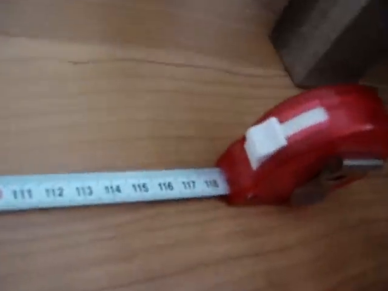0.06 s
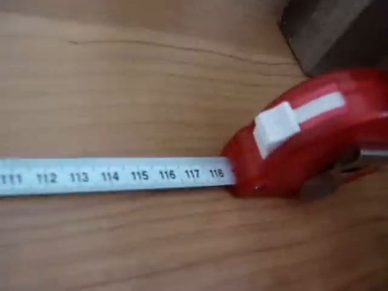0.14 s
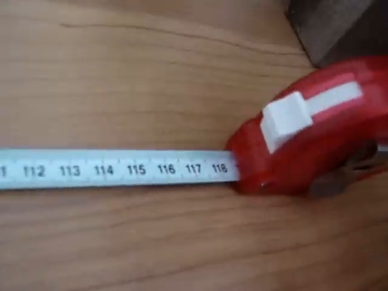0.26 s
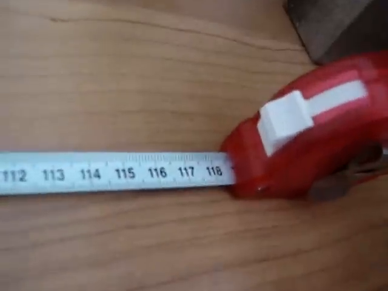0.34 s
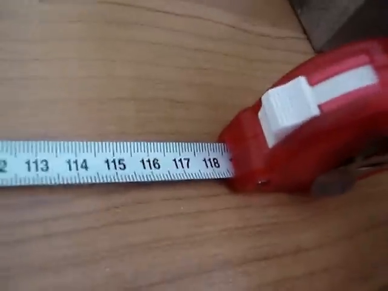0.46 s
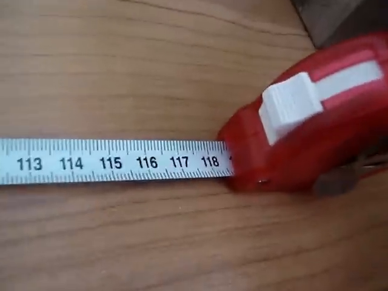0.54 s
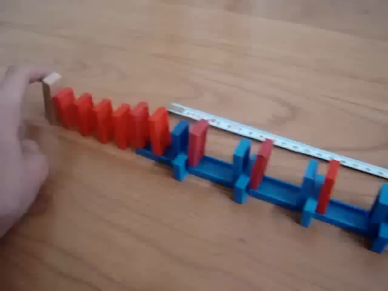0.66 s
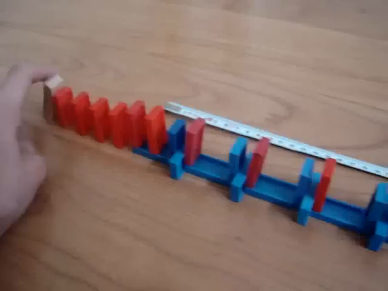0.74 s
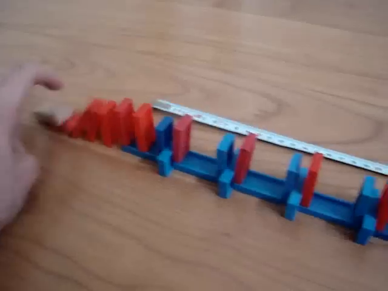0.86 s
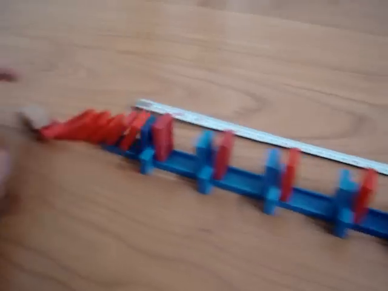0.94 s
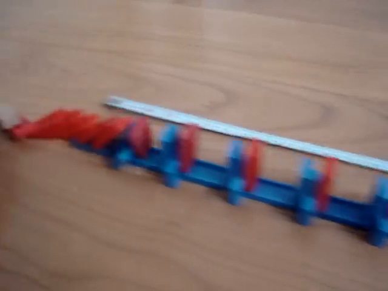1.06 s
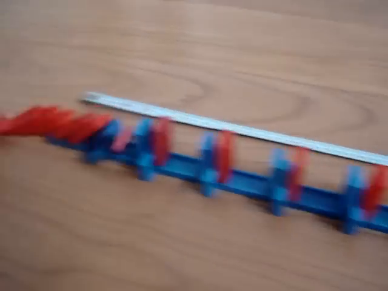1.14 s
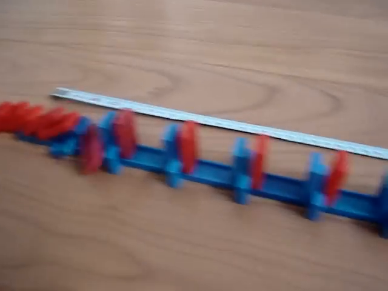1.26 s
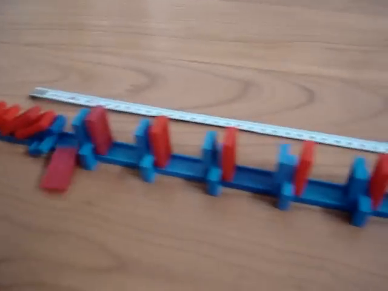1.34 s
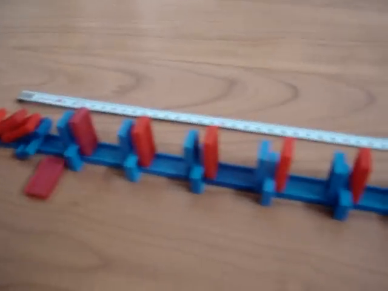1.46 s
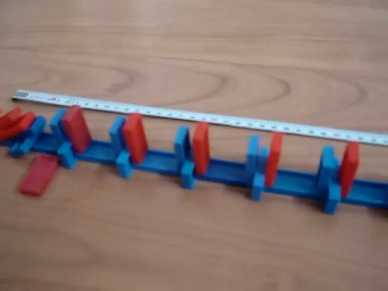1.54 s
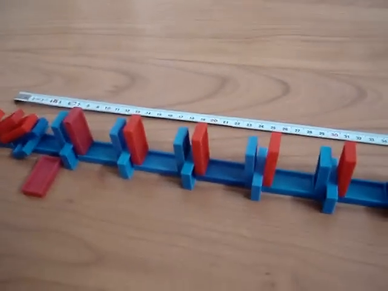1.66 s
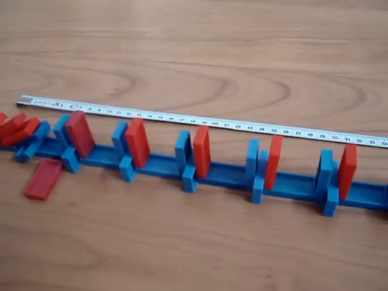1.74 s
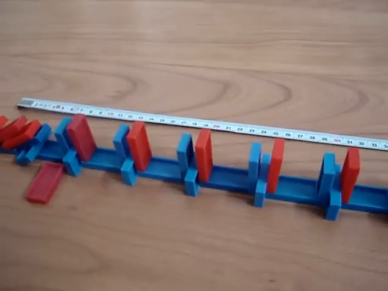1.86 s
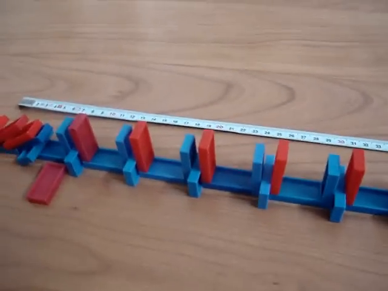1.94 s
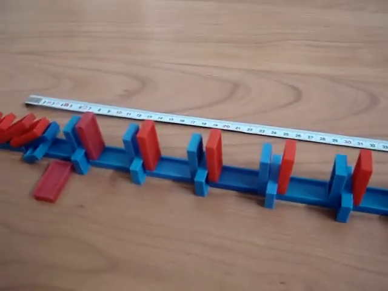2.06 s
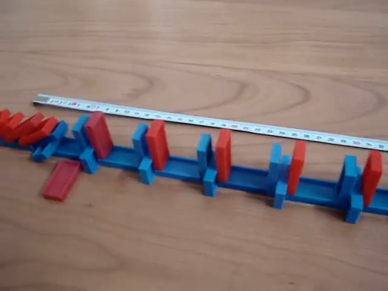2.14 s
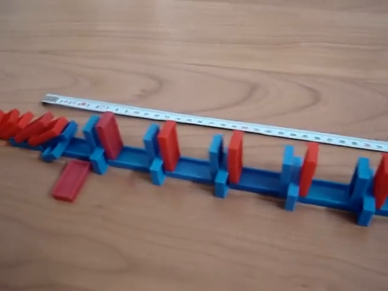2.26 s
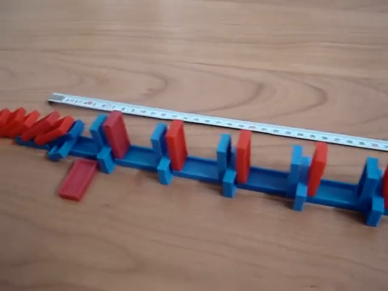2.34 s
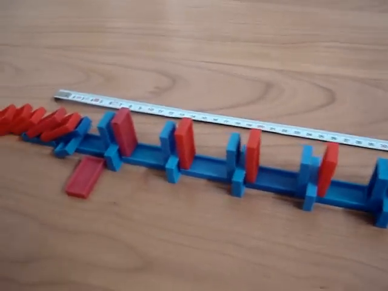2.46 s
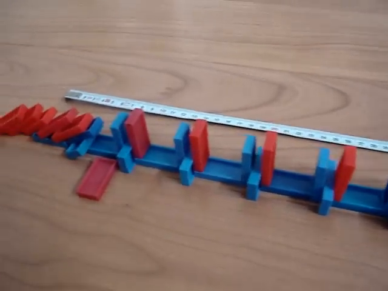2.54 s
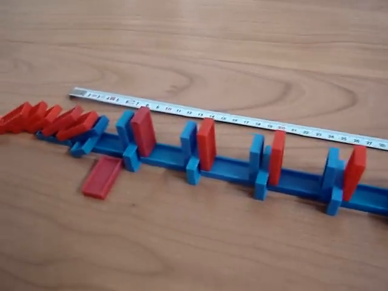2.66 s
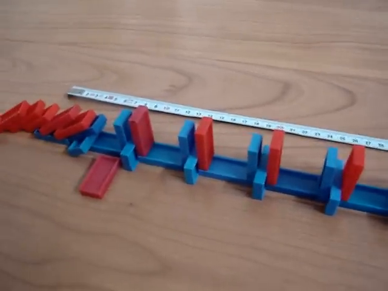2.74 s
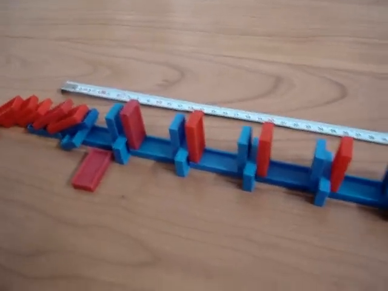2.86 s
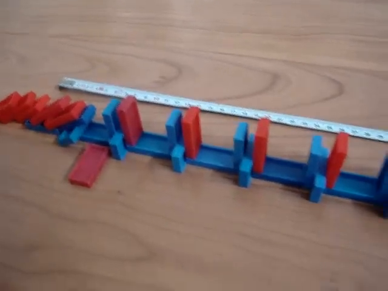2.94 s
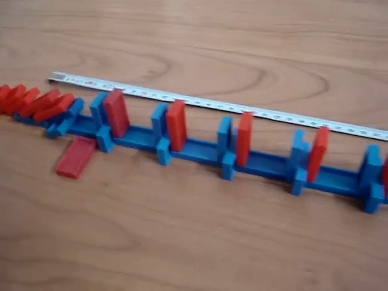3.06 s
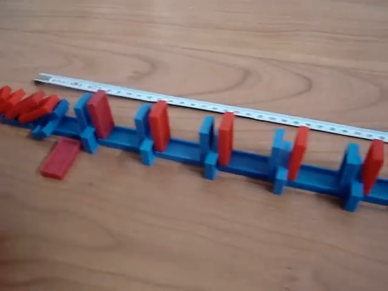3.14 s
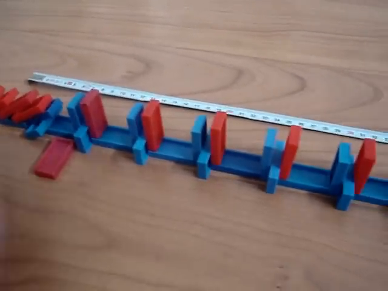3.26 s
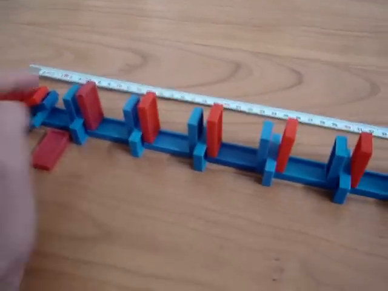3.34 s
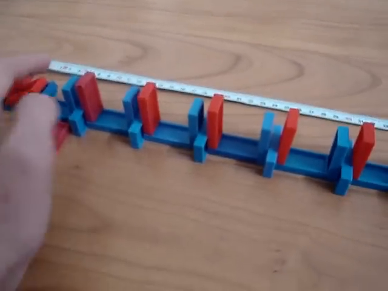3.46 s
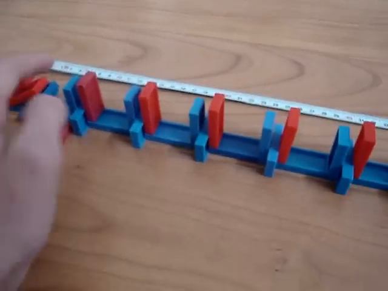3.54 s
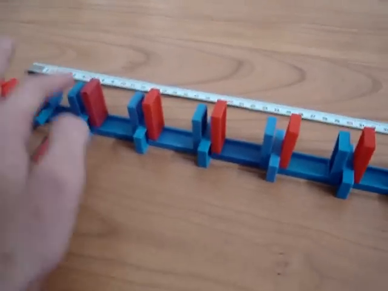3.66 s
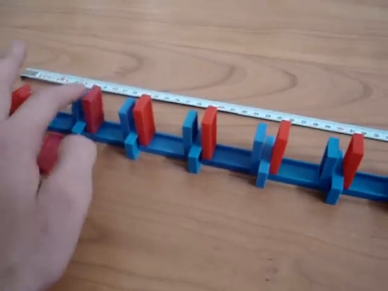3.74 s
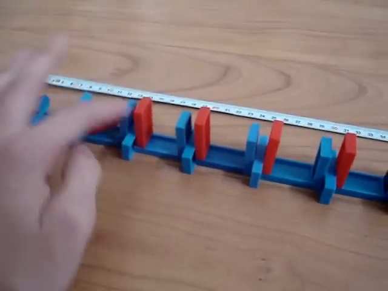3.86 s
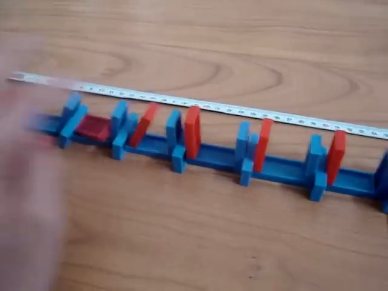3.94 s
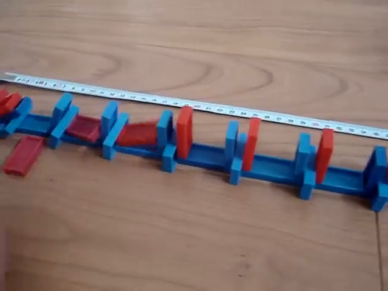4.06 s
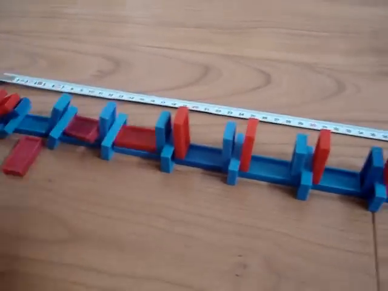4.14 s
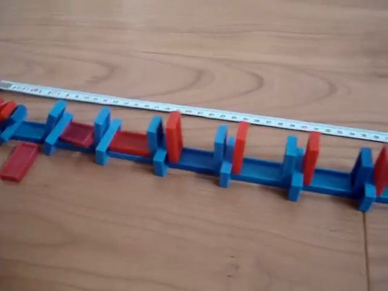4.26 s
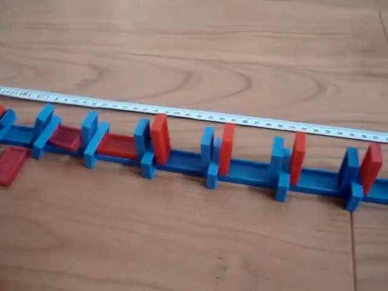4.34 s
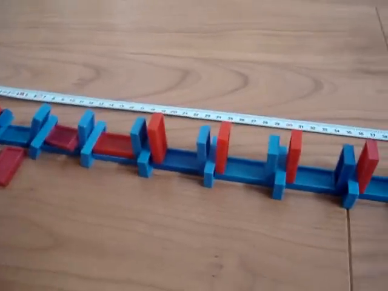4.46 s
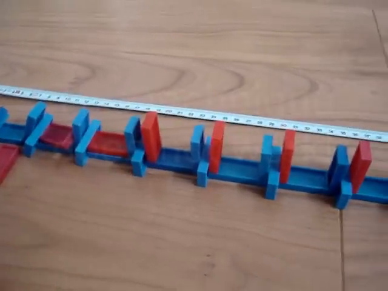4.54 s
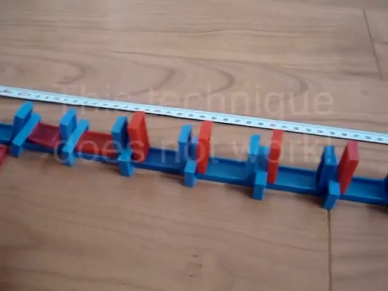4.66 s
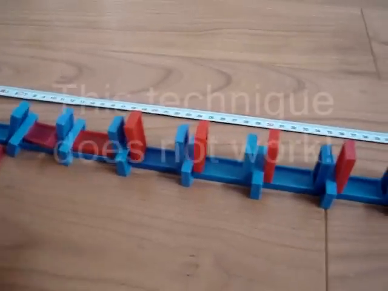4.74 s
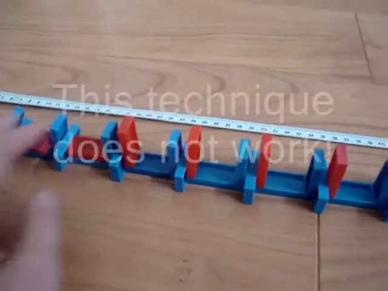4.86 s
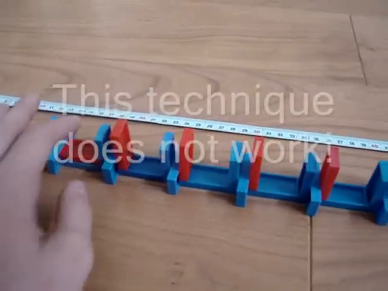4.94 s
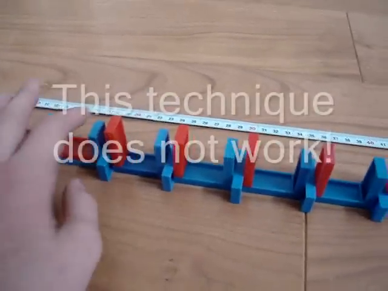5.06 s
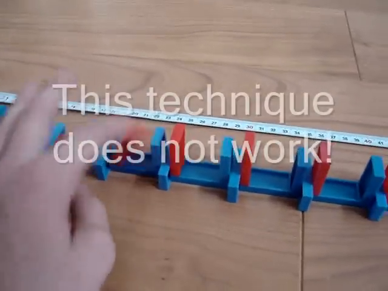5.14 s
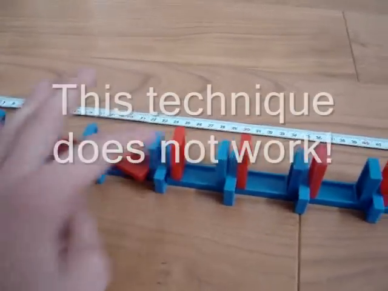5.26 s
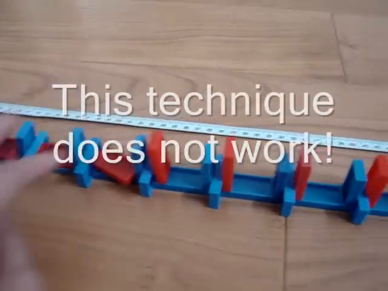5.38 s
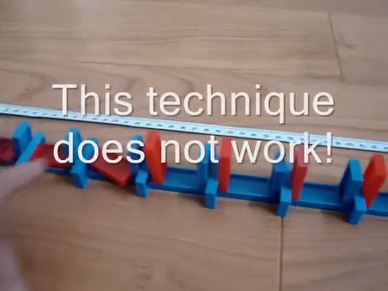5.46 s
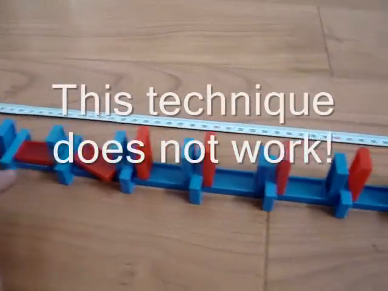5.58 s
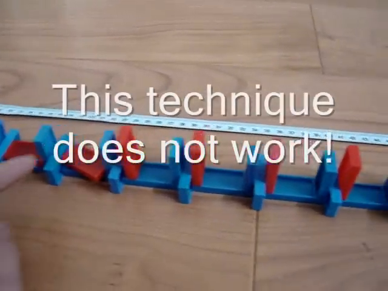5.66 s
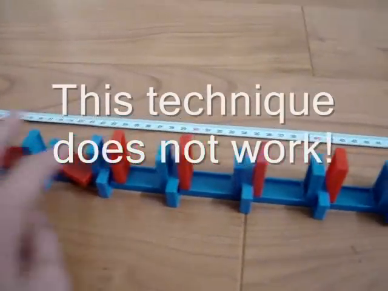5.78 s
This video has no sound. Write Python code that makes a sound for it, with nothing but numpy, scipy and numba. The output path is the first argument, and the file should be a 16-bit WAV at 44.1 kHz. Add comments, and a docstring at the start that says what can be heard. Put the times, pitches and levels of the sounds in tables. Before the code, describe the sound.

Small plastic dominoes topple on a wooden floor in a fast clicking run, followed by two shorter bursts of clatter.

```python
"""A faint hiss and one dry click, then small plastic dominoes topple along a plastic track on a wooden
floor: one long run, then a few pushed over by hand. Each contact cracks, rings the tiles near 5 kHz and
knocks the floor, and a bare room echoes it over a faint hum. A small camera picks it all up; its
automatic volume control dips after every burst and slowly comes back."""
import sys
import numpy as np
from scipy import signal
from scipy.fft import rfft, irfft
from scipy.io import wavfile
from numba import njit

SR = 44100
rng = np.random.default_rng(int(sys.argv[2]) if len(sys.argv) > 2 else 0)


def persist_wave(psi):
    """Save psi, clipped to +-1, as 16-bit WAV."""
    counts = np.round(np.clip(psi, -1, 1) * 32767).astype(np.int16)
    wavfile.write(sys.argv[1], SR, np.atleast_2d(counts).T)


N = 256220
TIME = np.arange(N) / SR
RING = TIME[:SR // 6]  # time axis of one short sound

# Single blows of tile on tile: (time [s], strength [dB], flatness [0 edge-on to 1 face down],
# extra ping level [dB], clack pitch [Hz], upper ring pitch [Hz])
SINGLE_BLOWS = [(0.899, -36.5, 0.96, 0, 2690, 7400), (0.954, -17, 0.56, 1, 4100, 7040),
                (0.98, -24, 0.82, -1, 3500, 6340), (0.987, -13, 0.39, -1, 3480, 6400),
                (1.003, -13.5, 0.52, -10, 3250, 6550), (1.149, -16.5, 0.33, -12, 4270, 6370),
                (1.272, -20, .2, -4, 3130, 5630), (1.305, -24.5, 0.54, -4, 4300, 9050),
                (1.312, -20.5, 0.85, -13, 4500, 8000), (1.386, -16, 0.9, 1.5, 3130, 7400),
                (1.42, -28, .5, -20, 4300, 6420), (1.438, -16.5, 0.59, 2, 2810, 7300),
                (1.477, -17, 0.79, 2.5, 3880, 8140), (1.529, -17, 0.68, -2, 4150, 8000),
                (1.576, -23, 0.52, -1.5, 4000, 7400), (3.817, -37.5, 0.27, -5.5, 3370, 6600),
                (3.965, -19.5, .23, -3, 3350, 5600), (3.974, -19, 0.19, -1.5, 4300, 5930),
                (3.996, -19, 0.36, -14, 4270, 6100), (4.026, -31, .05, 2.5, 4300, 6060),
                (4.095, -29, 0.28, -12, 4100, 5570), (4.148, -18, 0.23, -3.5, 4260, 6240),
                (4.158, -22.5, 0.049, -0.5, 4250, 6460), (4.224, -28.5, 0.68, -3, 3570, 7260),
                (4.248, -23, 0.59, -3, 3100, 9100), (4.264, -22, 0.44, -16, 3080, 6460),
                (4.281, -26.5, 0.69, -13.5, 3400, 6600), (5.3295, -16.5, 0.47, -3, 4260, 5760),
                (5.3655, -21.5, 1, 1.5, 3470, 6100), (5.3775, -18.5, 0.34, -9, 4300, 9100),
                (5.406, -25, 1, -11, 4120, 8850), (5.423, -27, 1, 5, 4230, 9130)]
# Rows of falling tiles, as points on a curve with the same columns
FIRST_ROW = [(0.993, -12, 0.24, -5, 3480, 6440), (1.02, -18, 0.13, 3, 2870, 6900),
             (1.06, -20, 0.13, -1, 4170, 8100), (1.095, -18.5, 0.23, -1, 4150, 6300),
             (1.118, -27.5, 0.73, 6, 3420, 8600), (1.16, -22.5, 0.43, -3, 3650, 6200),
             (1.22, -29.5, .5, -6, 3280, 6260)]
SECOND_ROW = [(1.444, -23.5, 0.62, 7, 2700, 8050), (1.465, -26, 0.49, 1.5, 3100, 7340),
              (1.52, -31.5, 0.27, 12.5, 4200, 8000), (1.58, -37, 0.51, 9.5, 4000, 8070),
              (1.62, -59, .55, -16, 4000, 8000)]
LAST_PUSH = [(5.338, -19, 0.27, -1.5, 4400, 5870), (5.37, -36, 0.32, -9, 4200, 6100),
             (5.39, -23, 0.43, -5, 4200, 8900), (5.43, -30, 0.2, -8, 4130, 8900)]
# Tiles landing flat: (time [s], level [dB])
SLAPS = [(0.9872, -4), (1.271, -11), (1.3862, -5.5), (3.9649, -8), (4.1481, -12.5), (4.2483, -9),
         (5.3298, -8.5), (5.3772, -0.5)]
# Fingers nudging tiles: (time [s], level [dB], pitch [Hz])
NUDGES = [(0.899, -20, 800), (2.122, -41, 2220), (3.034, -39, 1090), (3.044, -32.5, 1140),
          (3.33, -42.5, 2100), (3.818, -28, 730), (3.915, -30.5, 900), (3.925, -24, 1230),
          (5.267, -32, 1190), (5.664, -55.5, 2600)]
# A hand shifting on the camera: (time [s], level [dB])
BUMPS = [(2.116, -47), (2.93, -47), (3.32, -54), (3.688, -41), (4.94, -46), (5.232, -38)]

# Modes, the tones a struck thing rings with: (pitch [Hz], level [dB], time to fade by 60 dB [s])
CLACK_MODES = [(2470, -8, 0.006), (2830, 0, 0.0083), (2990, -0.5, 0.0075), (3325, -4, 0.0055),
               (3750, -5, 0.0078), (3970, -6, 0.015), (4277, 4.5, 0.011)]  # a tile's face
UPPER_MODES = [(5280, -0.5, 0.014), (5640, 4, 0.012), (6075, 5, .018), (6336, 4, 0.017), (6850, -3, 0.016),
               (7330, -5.5, .014), (7770, -3.5, 0.009), (8034, -0.5, 0.029), (8840, -0.5, 0.016),
               (9090, 1, 0.016), (9360, -12, 0.014), (13600, -9, 0.0103)]  # a tile's edge
PING_MODES = [(4566, -11, 0.023), (4776, -7.5, 0.0375), (4899, -3.5, 0.075), (5260, -6, 0.016),
              (7270, -17.5, 0.064), (10760, -27.5, 0.029), (11570, -29.5, 0.033), (12800, -26, 0.034),
              (14850, -20, .025)]  # a tile bending
FLOOR_MODES = [(157, -10.5, 0.019), (348, -13, 0.0175), (567, -1.5, 0.021), (648, -0.5, 0.024),
               (838, -4, 0.014), (1055, 1.5, 0.013), (1330, 0, 0.0114), (1633, 4, 0.0062),
               (2127, 4.5, 0.0087)]  # the wooden boards
TICK_MODES = [(1085, -2.5, 0.0077), (1790, -10, .008), (3470, 4.5, 0.0057), (4190, 5, 0.0063),
              (5980, 0.5, 0.00453)]  # the click at the camera

# Tone colour of the air before and after the edit cut: (frequency [Hz], relative level [dB])
EARLY_AIR = [(30, -36), (70, -18), (130, -9), (195, -1.5), (270, -8), (420, 0), (600, -3), (950, -9.5),
             (1500, -9.5), (2500, -14.5), (8000, -20.5), (16000, -25)]
LATE_AIR = [(30, -8), (70, -6.5), (120, -4), (190, -3.5), (340, -2.5), (480, -7.5), (750, -4),
            (1200, -10.5), (2400, -12), (5000, -18), (9700, -20.5), (10200, -32.5), (16000, -30.5)]
# Tones of a humming appliance: (pitch [Hz], level [dB], waver [radians])
HUM_TONES = [(194, -61.5, 0.27), (278.7, -52.5, 1)]
# The hum swelling and sinking: (time [s], level change [dB])
HUM_SWELL = [(.8, 1.5), (2.5, -3), (3.2, 2.5), (5.3, 0), (5.45, -3)]

RUN_JITTER, RUN_SCATTER_DB = .2, 1.5  # unevenness of a run: timing (share of a gap) and strength
FLAT_TRADE_DB = 16.5  # from edge-on to face down the clack gains this much and the upper ring loses it
TRACK_FROM_S = 1.6  # tiles fall on the bare boards before this, on the track after it
BOARD_KNOCK_DB, TRACK_KNOCK_DB = -13, -17.5  # floor knock compared with the blow's strength


def topple(curve, count):
    """Tiles knock each other over at a nearly even pace; returns rows like SINGLE_BLOWS."""
    times, *columns = np.transpose(curve)
    timing, force = rng.standard_normal((count, 2)).T
    gap_s = (times[-1] - times[0]) / count
    starts = np.linspace(times[0], times[-1], count) + RUN_JITTER * gap_s * timing
    db, *rest = (np.interp(starts, times, column) for column in columns)
    return list(zip(starts, db + RUN_SCATTER_DB * force, *rest))


def clatter(blows):
    """Every contact snaps and knocks the floor; a tile's edge rings, its flat face clacks."""
    out = np.zeros(N)
    for s, db, flatness, _, clack_hz, upper_hz in blows:
        clack_db = db - FLAT_TRADE_DB * (1 - flatness)
        upper_db = db - FLAT_TRADE_DB * flatness
        knock_db = db + (BOARD_KNOCK_DB if s < TRACK_FROM_S else TRACK_KNOCK_DB)
        clack = strike(CLACK_MODES, .026, scatter_db=3.5, focus_hz=clack_hz, focus_db=27, rise_s=.0003)
        buzz = level_start(crack(.042, .73 * clack_hz, 1.176 * clack_hz))  # the face on the track
        upper = strike(UPPER_MODES, .014, scatter_db=1.5, focus_hz=upper_hz, focus_db=17.5, rise_s=.00047)
        snap = crack(fade_s=.0019, lo_hz=1530, hi_hz=6880)
        scrape = crack(fade_s=.11, lo_hz=1170, hi_hz=15040)  # edges slide past each other
        knock = strike(FLOOR_MODES, detune=.072, scatter_db=3.5)
        add(out, s, undb(db + 6.5) * snap)
        add(out, s, undb(upper_db + 3) * scrape)
        add(out, s, undb(knock_db) * knock)
        add(out, s, undb(clack_db + 3) * bounce(clack + .89 * buzz, gap_s=.003, step_db=-7))
        add(out, s, undb(upper_db + 3.5) * bounce(upper, gap_s=.0026, step_db=-6.5))
    return out


def pings(blows, free_s=.016, choke_s=.0011, choked_db=-20):
    """A struck tile bends and rings until it leans on its neighbour, which muffles it."""
    out = np.zeros(N)
    leaning_s = np.maximum(RING - free_s, 0)
    choke = np.maximum(np.exp(-leaning_s / choke_s), undb(choked_db))
    for s, db, _, extra_db, *_ in blows:
        ring = strike(PING_MODES, detune=.0086, scatter_db=.5)
        ping = bounce(ring, gap_s=.004, step_db=-3)
        add(out, s, undb(db + extra_db + 4) * ping * choke)
    return out


def slaps(pulse_s=.00005, thump_db=-36, thump_hz=34, thump_fade_s=.18):
    """A flat landing squeezes out a sharp pulse of air; a deep thump follows as it overloads the camera."""
    out = np.zeros(N)
    pulse = RING / pulse_s * np.exp(1 - RING / pulse_s)
    thump = undb(thump_db - 60 * RING / thump_fade_s) * np.sin(2 * np.pi * thump_hz * RING)
    for s, db in SLAPS:
        snap = undb(4.5) * crack(fade_s=.00088, lo_hz=1780, hi_hz=7000)
        add(out, s, undb(db) * (snap - pulse - thump))
    return out


def fingers():
    """Soft, dull taps and rubs as a hand touches the tiles and the track."""
    out = np.zeros(N)
    grip = 1 - np.exp(-RING / .001)  # skin takes hold gradually
    for s, db, hz in NUDGES:
        tap = strike(FLOOR_MODES, detune=.057, scatter_db=.5, focus_hz=hz, focus_db=9, rise_s=.00073)
        rub = grip * crack(fade_s=.069, lo_hz=1520, hi_hz=6960)
        add(out, s, undb(db) * (undb(-11.5) * tap + undb(-1.5) * rub))
    return out


def tick(at_s=.7358):
    """One dry click right at the camera: a short ring and a snap."""
    out = np.zeros(N)
    add(out, at_s, undb(-28) * strike(TICK_MODES, detune=.0063, scatter_db=0))
    add(out, at_s, undb(-19) * crack(fade_s=.0019, lo_hz=1520, hi_hz=5960))
    return out


def hand_bumps(rise_s=.014):
    """Soft low bumps travel from the hand through the camera body to the microphone."""
    out = np.zeros(N)
    swell = RING / rise_s * np.exp(1 - RING / rise_s)
    for s, db in BUMPS:
        rumble = unit(band(rng.standard_normal(len(RING)), 137, 207))
        add(out, s, undb(db - 6.5) * swell * rumble)
    return out


def room_echo(x, fade_s=.46, treble_fade_s=.42):
    """A few near surfaces reflect first, then comes a smooth tail whose treble dies sooner."""
    t = TIME[:SR * 3 // 4]
    low, high = rng.standard_normal((2, len(t)))
    tail = band(low, 350, 5760) * undb(-60 * t / fade_s)
    tail += band(high, 9100, .48 * SR) * undb(-60 * t / treble_fade_s)
    tail *= np.clip((t - .002) / .0057, 0, 1)
    tail *= undb(-2.5) / np.sqrt(np.sum(tail ** 2))
    near_echoes = (rng.uniform(.002, .014, size=5) * SR).astype(int)
    tail[near_echoes] += undb(-16.5)
    return signal.fftconvolve(x, tail)[:N]


def background(cut_s=.79):
    """At an edit cut the hiss jumps to a duller background with hum and thin whine."""
    late = undb(-49 + .45 * drift(5.4)) * noise(LATE_AIR)
    swell_db = np.interp(TIME, *np.transpose(HUM_SWELL))
    for hz, db, waver in HUM_TONES:
        gain = undb(db + swell_db + 1.7 * drift(7.7))
        late += gain * unit(np.sin(2 * np.pi * hz * TIME + waver * drift(6.4)))
    whine = undb(-64) * unit(band(rng.standard_normal(N), 7670, 8000))
    early = undb(-50.5) * noise(EARLY_AIR)
    return np.where(TIME < cut_s, early, late + whine)


def strike(modes, detune, scatter_db, focus_hz=1000, focus_db=0, rise_s=.0006):
    """One blow rings the modes, each a bit off pitch and focus_db weaker per octave from focus_hz."""
    hz, db, fade_s = np.transpose(modes)[:, :, None]
    pitch, share, side = rng.standard_normal((3, len(modes), 1))
    db = db + scatter_db * share - focus_db * np.abs(np.log2(hz / focus_hz))
    waves = np.sign(side) * np.sin(2 * np.pi * hz * (1 + detune * pitch) * RING)
    ring = np.sum(undb(db - 60 * RING / fade_s) * waves, axis=0)
    return level_start(ring * (1 - np.exp(-RING / rise_s)))


def crack(fade_s, lo_hz, hi_hz):
    """Two surfaces meet in a burst of noise with peak 1 that drops 60 dB in fade_s."""
    x = band(rng.standard_normal(len(RING)) * undb(-60 * RING / fade_s), lo_hz, hi_hz)
    return x / np.abs(x).max()


def bounce(x, gap_s, step_db, count=4):
    """A light tile bounces within milliseconds, first at full strength, then ever weaker."""
    out = x.copy()
    for k, s in enumerate(np.cumsum(gap_s * rng.uniform(.4, 1.6, count))):
        add(out, s, x * undb(step_db * k))
    return level_start(out)


def undb(db):
    """Turn decibels into a gain."""
    return 10 ** (np.asarray(db) / 20)


def unit(x):
    """Scale to an average (rms) level of 1."""
    return x / np.sqrt(np.mean(x ** 2))


def level_start(x):
    """Scale so that the first 20 ms have an average (rms) level of 1."""
    return x / np.sqrt(np.mean(x[:SR // 50] ** 2))


def add(out, s, x):
    """Mix x into out at s seconds."""
    i = int(s * SR)
    out[i:i + len(x)] += x[:len(out) - i]


def band(x, lo_hz, hi_hz):
    """Keep the frequencies between lo_hz and hi_hz."""
    return signal.sosfilt(signal.butter(2, [lo_hz, hi_hz], "band", fs=SR, output="sos"), x)


def noise(points):
    """Noise shaped by points of (frequency [Hz], level [dB])."""
    hz, db = np.transpose(points)
    bins = np.arange(N // 2 + 1) * SR / N
    gains = undb(np.interp(np.log(bins + 1), np.log(hz), db))
    return unit(irfft(rfft(rng.standard_normal(N)) * gains, N))


def drift(rate_hz):
    """A slow random wander, about 1 in size."""
    return noise([(1, 0), (rate_hz + 1, 0), (4 * rate_hz + 4, -80)])


@njit
def follow_peaks(x, attack_s, release_s):
    """Track the level of x, rising fast and falling slowly."""
    out, level = np.empty(len(x)), 0.
    for i in range(len(x)):
        size = abs(x[i])
        level += (size - level) / (SR * (attack_s if size > level else release_s))
        out[i] = level
    return out


def volume_control(x, threshold_db, attack_s, release_s, ratio):
    """Turn the sound down above a threshold; the first spike of a burst slips through."""
    excess = np.maximum(follow_peaks(x, attack_s, release_s) / undb(threshold_db), 1)
    return x * excess ** (1 / ratio - 1)


def scene():
    """Tiles and fingers in the room, with the camera's own noises and the background."""
    blows = SINGLE_BLOWS + topple(FIRST_ROW, count=26) + topple(SECOND_ROW, count=18)
    blows += topple(LAST_PUSH, count=8)
    tiles = clatter(blows) + fingers()
    ping, slap = pings(blows), slaps()
    echo = room_echo(tiles + undb(-4.5) * ping + undb(-19) * slap)
    return (tiles + ping + slap + echo + tick() + hand_bumps() + background())[None]


def record(dry):
    """The camera bends loud peaks unevenly, dips its volume, flattens bursts and cuts the top treble."""
    bent = dry[0] - .074 * np.tanh(dry[0]) ** 2
    dipped = volume_control(bent, threshold_db=-26, attack_s=.00033, release_s=1.16, ratio=1.372)
    flattened = volume_control(dipped, threshold_db=-12, attack_s=.0007, release_s=.012, ratio=3)
    treble_cut = signal.ellip(10, .2, 80, 15800, fs=SR, output="sos")
    return signal.sosfilt(treble_cut, np.clip(flattened, -1, 1))[None]


dry = scene()
out = record(dry)
persist_wave(out)
```